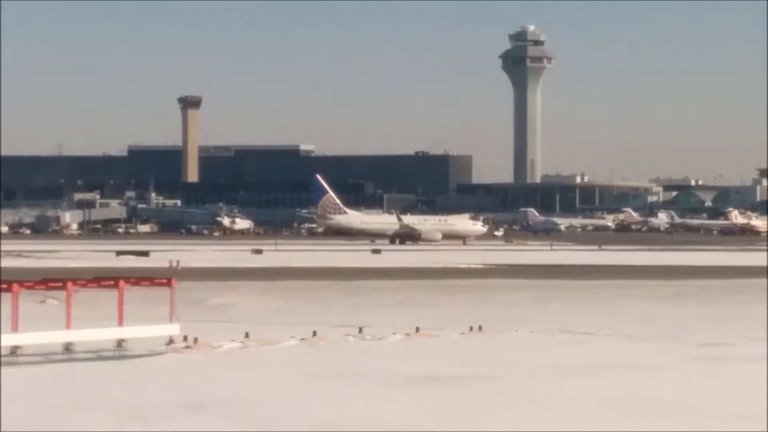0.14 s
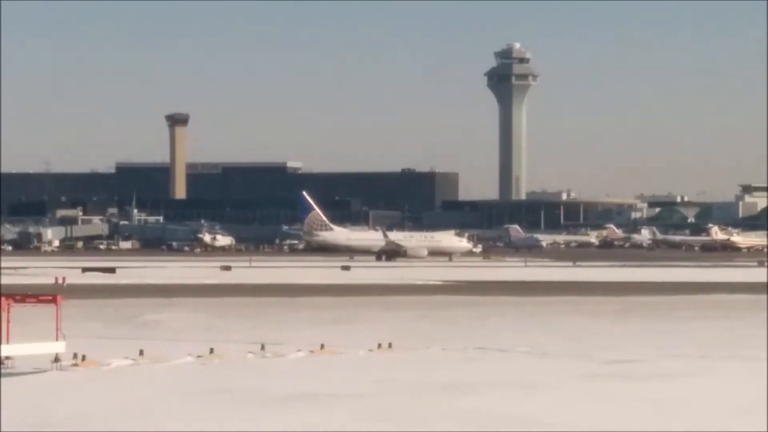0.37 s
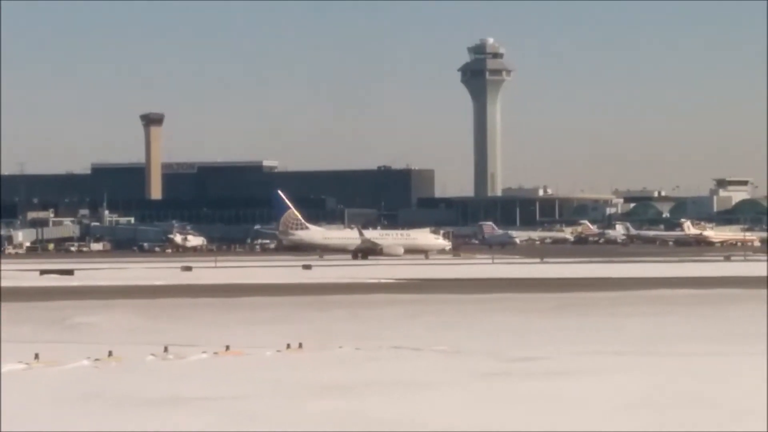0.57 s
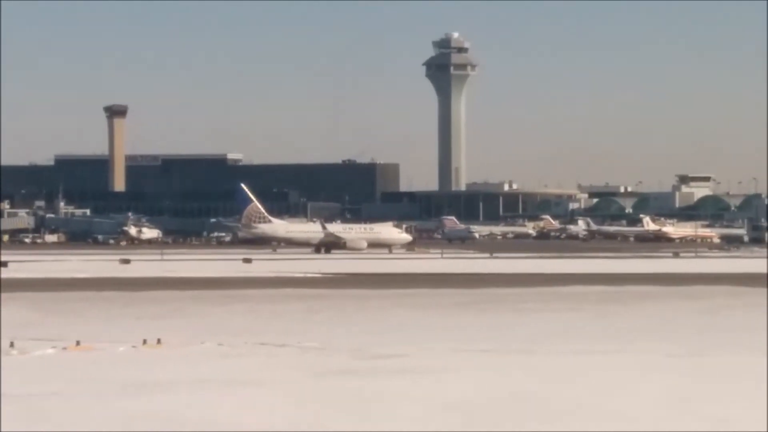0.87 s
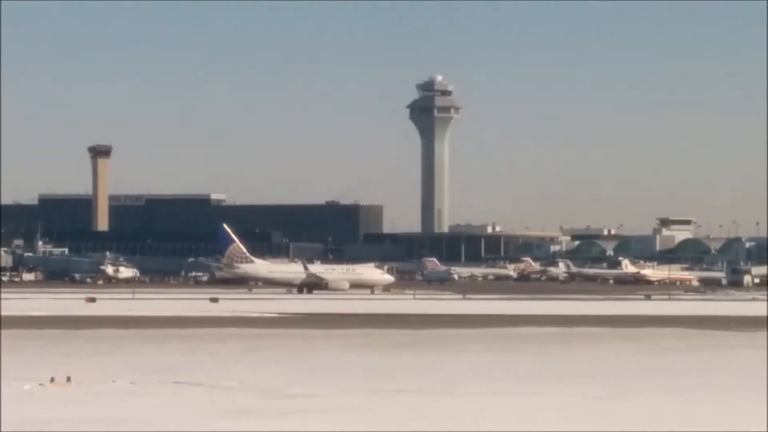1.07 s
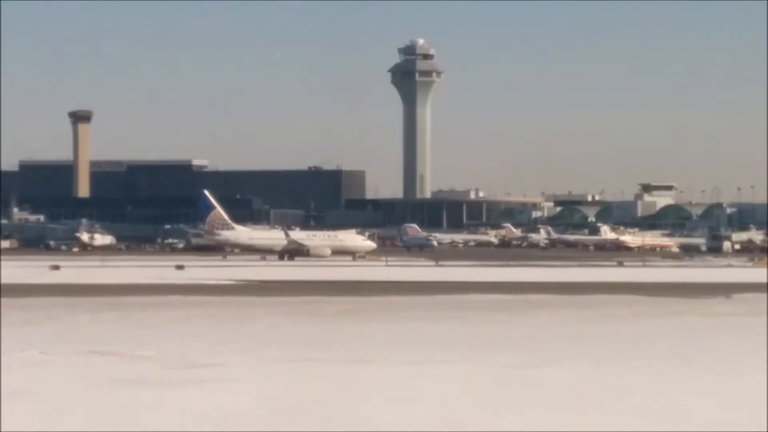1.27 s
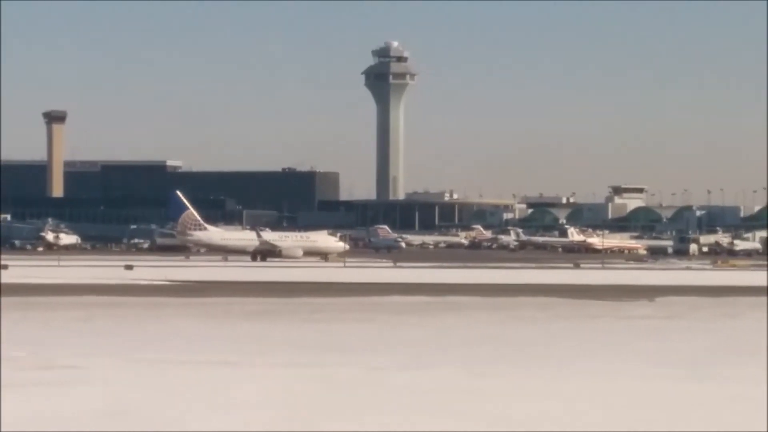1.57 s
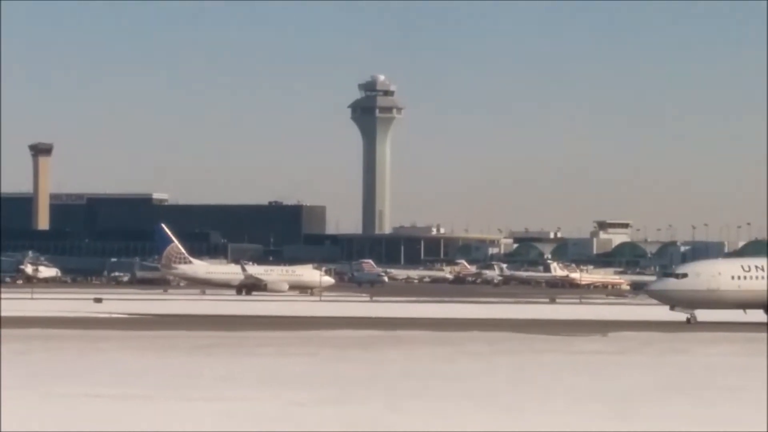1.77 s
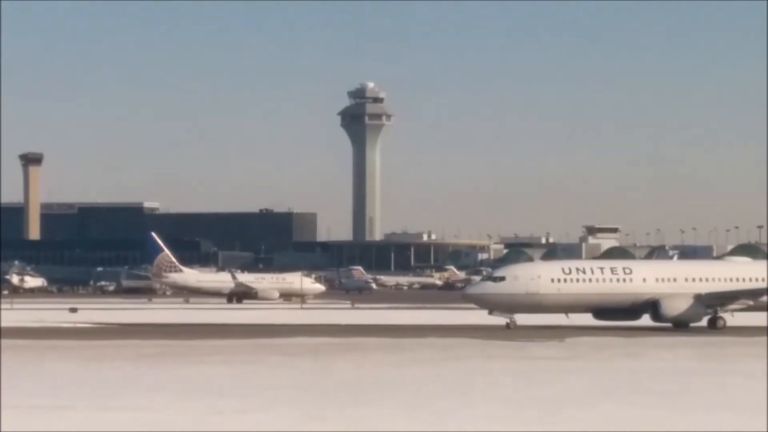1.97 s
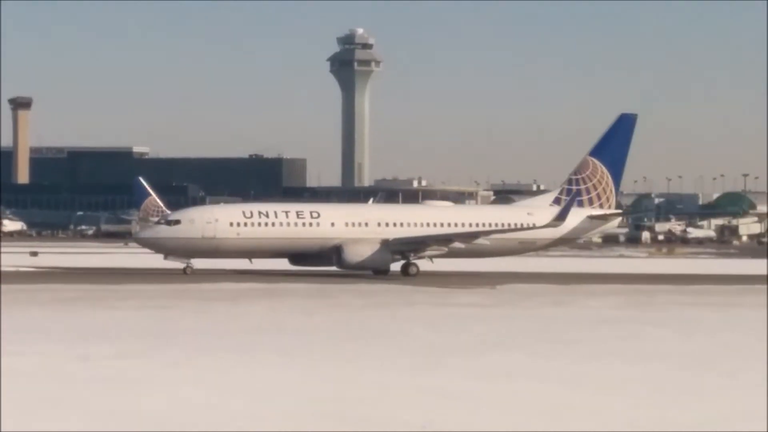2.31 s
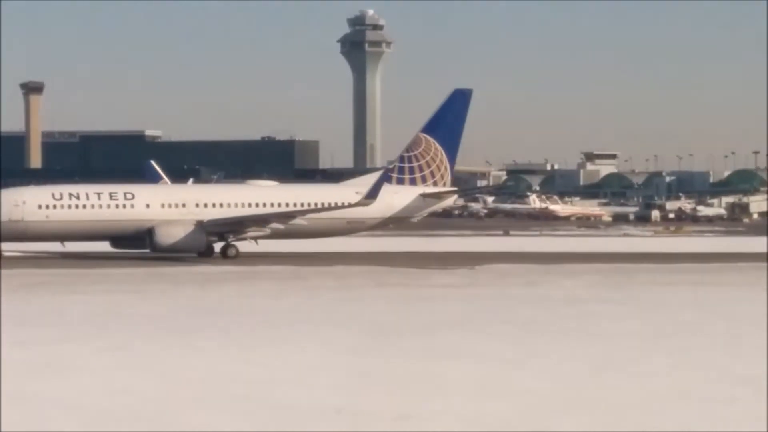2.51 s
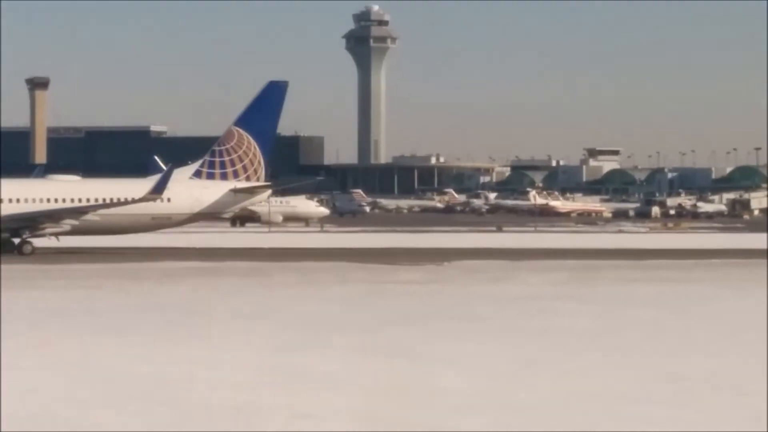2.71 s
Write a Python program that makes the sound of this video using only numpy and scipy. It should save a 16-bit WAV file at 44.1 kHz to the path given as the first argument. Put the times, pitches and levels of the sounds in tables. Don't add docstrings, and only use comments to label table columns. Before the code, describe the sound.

Low cabin rumble of a taxiing airliner runs throughout, with irregular booming wheel jolts, strong near 0.25 and 1.0 seconds. A wavering low engine hum and muffled roar continue beneath, swelling near 1.8, with faint ventilation hiss. Close to the microphone, a soft hollow knock at 0.56, ticks around 0.65 and 1.15-1.4, a gritty scuff at 1.05, fabric rustle and tiny squeaks; one last tick near 2.05.

```python
import sys
import numpy as np
from scipy import signal
from scipy.fft import rfft, irfft, next_fast_len
from scipy.io import wavfile

SR = 44100
rng = np.random.default_rng(int(sys.argv[2]) if len(sys.argv) > 2 else 0)


def amplitude_ratio(level_db):
    exponent = np.asarray(level_db, float) / 20
    return 10 ** exponent


def waveform_to_disk(signal):
    frames = np.transpose(np.atleast_2d(signal))
    scaled = np.clip(frames, -1, 1) * 32767
    samples = np.round(scaled).astype(np.int16)
    wavfile.write(sys.argv[1], SR, samples)


N = 125685
TIME = np.arange(N) / SR


def rms_one(x):
    return x / np.sqrt(np.mean(x ** 2) + 1e-20)


def in_time(rows):
    s, *columns = np.transpose(rows)
    return [np.interp(TIME, s, column) for column in columns]


def drift(rate):
    hop = 40
    r = np.exp(-2 * np.pi * rate * hop / SR)
    noise = rng.standard_normal(N // hop + 2002)
    slow = signal.lfilter([1], [1, -2 * r, r * r], noise)[2000:]
    return np.interp(np.arange(N) / hop, np.arange(len(slow)), rms_one(slow))


def swell(start, length, rise):
    u = np.clip((TIME - start) / length, 0, 1)
    rise = np.clip(rise, .05, .95)
    return np.sin(np.pi / 2 * np.minimum(u / rise, (1 - u) / (1 - rise))) ** 2


def resonate(x, hz, width_hz):
    r = np.exp(-np.pi * width_hz / SR)
    gain = (1 - r * r) / 2
    return signal.lfilter([gain, 0, -gain], [1, -2 * r * np.cos(2 * np.pi * hz / SR), r * r], x + 1e-18)


def humming_noise(hz, width_hz):
    noise = rng.standard_normal(2 * N)
    return rms_one(resonate(resonate(noise, hz, width_hz), hz, width_hz)[N:])


def filtered(x, order, hz, kind):
    return signal.sosfilt(signal.butter(order, hz, kind, fs=SR, output="sos"), x)


def coloured(spectrum, patchy_db, rate):
    hz, db = np.transpose(spectrum)
    size = next_fast_len(N)
    freqs = np.arange(size // 2 + 1) * SR / size + 1e-3
    colour_db = np.interp(np.log(freqs), np.log(hz), db, left=-90, right=-90)
    shaped = rfft(rng.standard_normal(size)) * amplitude_ratio(colour_db)
    place = 4 * np.log2(freqs / hz[0])
    together = drift(rate / 2)
    out = np.zeros(N)
    for k in range(int(4 * np.log2(hz[-1] / hz[0])) + 2):
        window = np.cos(np.pi / 2 * np.clip(place - k, -1, 1)) ** 2
        band = irfft(shaped * window, size)[:N]
        out += band * amplitude_ratio(patchy_db * (0.37 * together + drift(rate)))
    return rms_one(out)


# (time [s], level [dB])
SHAKING = [(0.0, -35.5), (0.52, -38), (0.54, -30), (0.68, -35), (1.02, -36), (1.03, -31), (1.11, -35.5),
           (1.72, -34), (1.85, -33), (1.88, -28), (1.91, -37.5), (2.17, -31.5), (2.23, -36), (2.29, -33),
           (2.52, -39), (2.54, -31), (2.73, -38), (2.85, -32)]


def shaking_level():
    return in_time(SHAKING)[0]


# (time [s], level [dB])
ROUGHNESS = [(0, 8), (.1, 1.5), (.35, 12), (.43, -14.5), (.5, 4), (.86, -1.5), (.95, -7.5), (1.08, -4),
             (1.24, 1.5), (1.32, 3), (1.38, -6.5), (1.7, 1.5), (2.02, 1.5), (2.18, -2), (2.26, 2),
             (2.5, -3), (2.7, 8), (2.75, 3)]


def rolling_level():
    return in_time(ROUGHNESS)[0]


# (start [s], length [s], depth [dB])
SMOOTH_STRETCHES = [
    (0.862, 0.098, -3),
    (1.304, 0.041, -3),
    (2.464, 0.063, -1.5),
    (2.602, 0.034, -14.5),
    (2.72, 0.045, -7),
]


def airframe_unevenness():
    lull_db = sum(db * swell(s, length, 0.58) for s, length, db in SMOOTH_STRETCHES)
    return amplitude_ratio(1.6 * drift(11.9) + lull_db)


# (frequency [Hz], level [dB per Hz])
AIR_COLOUR = [(760, -32.5), (1300, -14.5), (1790, -18), (2140, -11.5), (2520, -5.5), (3480, -15.5),
              (4200, -16.5), (6100, -28), (15500, -40)]


def ventilation_air(stir_db):
    cavity = amplitude_ratio(-58.5 + 3.2 * drift(16)) * humming_noise(2045, 420)
    hiss = amplitude_ratio(-64) * coloured(AIR_COLOUR, patchy_db=3.0, rate=20)
    return amplitude_ratio(0.61 * (stir_db - stir_db.mean())) * (hiss + cavity)


# (frequency [Hz], level [dB per Hz])
ROAR_COLOUR = [(110, -47.5), (180, -6.5), (211, -6.5), (241, -10.5), (351, -14.5), (378, -18.5), (535, -28),
               (1060, -39), (1700, -47.5), (2210, -85.5), (3740, -120)]


def engine_roar(shake_db, roll_db):
    return amplitude_ratio(shake_db + 0.22 * roll_db + 2.5) * coloured(ROAR_COLOUR, patchy_db=4.0, rate=40)


# (frequency [Hz], width [Hz], level [dB])
WEAK_HUMS = [
    (275, 16, -53),
    (140.2, 43, -27.5),
]


def weak_hums():
    return sum(amplitude_ratio(db) * humming_noise(hz, width_hz) for hz, width_hz, db in WEAK_HUMS)


# (time [s], gear tone level [dB], upper tone level [dB])
SECOND_ENGINE = [(0.0, -40, -60), (0.31, -44, -42.5), (0.42, -44, -64), (0.46, -39.5, -49),
                 (0.79, -40, -61), (0.92, -38.5, -33.5), (0.97, -34, -39), (1.42, -44, -45),
                 (1.5, -33.5, -41), (1.67, -45, -55.5), (1.82, -41, -40.5), (2.09, -37, -53.5),
                 (2.14, -34, -38), (2.48, -39.5, -58.5), (2.51, -41, -42.5), (2.64, -31, -61.5),
                 (2.67, -43.5, -42), (2.85, -30.5, -37.5)]


def second_engine():
    gear_db, upper_db = in_time(SECOND_ENGINE)
    gear = np.sin(2 * np.pi * np.cumsum(347.7 + 2 * drift(6.3)) / SR)
    return amplitude_ratio(gear_db + 1.5) * gear + amplitude_ratio(upper_db - 1.5) * humming_noise(412.8, 23)


# (time [s], level [dB])
SHAFT_LEVEL = [(0, -28.5), (.25, -36.5), (.3, -24.5), (.44, -52), (.54, -22), (.67, -26), (.75, -33),
               (1.13, -35.5), (1.6, -33), (1.72, -22), (1.77, -44), (1.83, -15.5), (1.97, -36),
               (2.1, -25.5), (2.19, -29), (2.3, -22), (2.76, -36), (2.82, -25.5)]


def shaft_hum():
    db, = in_time(SHAFT_LEVEL)
    pitch_hz = 206.8 + 2.184 * drift(10.0)
    return np.sqrt(2) * amplitude_ratio(db) * np.sin(2 * np.pi * np.cumsum(pitch_hz) / SR)


# (time [s], level [dB])
RUSTLE_LEVEL = [(0, -54), (.2, -59.5), (.38, -68.5), (.52, -73.5), (.68, -49.5), (.78, -62), (1.0, -55),
                (1.17, -51.5), (1.3, -50), (1.45, -62.5), (1.62, -69.5), (2.04, -75.5), (2.065, -56),
                (2.17, -70.5), (2.4, -69.5), (2.68, -74), (2.705, -61.5), (2.8, -67.5)]
# (frequency [Hz], level [dB per Hz])
CLOTH_COLOUR = [(2470, -48.5), (4200, -13.5), (4510, -37.5), (5030, -12), (6760, 3.5), (7790, 3),
                (9380, -3), (11900, -7), (15500, -22)]


def fabric_rustle():
    db, = in_time(RUSTLE_LEVEL)
    bright = coloured(CLOTH_COLOUR, patchy_db=1.0, rate=15)
    dull = amplitude_ratio(-8) * rms_one(resonate(rng.standard_normal(N), 3510, 1100))
    return amplitude_ratio(db) * (bright + dull)


# (start [s], length [s], pitch [Hz], glide [Hz], level [dB])
RUBS = [(1.542, .02, 3600, -500, -58), (1.644, .055, 3150, -450, -54), (1.965, .055, 2700, 200, -57),
        (2.432, .035, 3880, -30, -58), (2.692, .045, 4000, -200, -59), (1.055, .03, 4200, 30, -46),
        (1.785, .06, 5850, 0, -69), (1.86, .09, 5850, 0, -73), (1.96, .04, 5850, 0, -70),
        (2.0, .03, 5800, 0, -73), (1.75, .04, 4700, 50, -69), (2.055, .025, 4300, -100, -66),
        (2.67, .07, 4750, 0, -70), (2.78, .05, 4750, -50, -70), (2.56, .05, 3900, 0, -70),
        (2.055, .035, 5500, -200, -57), (1.17, .1, 5600, 0, -58)]


def trim_squeaks():
    blur_width_hz = 260
    steady, sideways = filtered(rng.standard_normal((2, N)), 2, blur_width_hz / 2, "low")
    steady, sideways = .6 + rms_one(steady), rms_one(sideways)
    out = np.zeros(N)
    for s, length, hz, glide_hz, db in RUBS:
        age = TIME - s
        phase = 2 * np.pi * age * (hz + glide_hz * age / length / 2)
        tone = steady * np.sin(phase) + sideways * np.cos(phase)
        out += amplitude_ratio(db) * swell(s, length * 1.1, .3) * tone
    return out


# (time [s], peak level [dB], brightness [dB])
TICKS = [(0.572, -33.5, -22), (0.663, -42, -5), (1.174, -36, 9.5), (1.232, -43.5, 3.5), (0.6389, -22.5, -7),
         (0.6514, -26, -20), (0.6754, -47, -9), (0.687, -33, -6), (0.9103, -33.5, -3.5), (1.1602, -22, 2.5),
         (1.17, -25, 4.5), (1.2084, -42, 1), (1.237, -24.5, -19.5), (1.2574, -26, -23), (1.272, -16.5, -6),
         (1.3854, -33.5, -5), (1.769, -42, -1.5), (2.034, -39, -33.5), (2.056, -22.5, -26)]


def trim_ticks():
    rattle, crack = np.zeros(N), np.zeros(N)
    for s, db, bright_db in TICKS:
        age = np.maximum(TIME - s, 0)
        rattle += amplitude_ratio(db) * np.tanh(age / 0.0013) * np.exp(-age / 0.0045)
        tail = 0.4 * np.exp(-age / 0.0081)
        snap = 4 * amplitude_ratio(-6) * np.exp(-age / 0.001)
        crack += amplitude_ratio(db + bright_db) * np.tanh(age * 1500) * (tail + snap)
    ring = 5 * resonate(rattle * rng.standard_normal(N), 5530, 340)
    bright = filtered(crack * rng.standard_normal(N), 1, [5600, 9000], "band")
    return filtered(amplitude_ratio(-11) * ring + amplitude_ratio(-5.5) * bright, 4, 5000, "high")


# (time [s], level [dB])
SCUFF_LEVEL = [(1.005, -49), (1.021, -32.5), (1.04, -31.5), (1.062, -35), (1.08, -34.5), (1.11, -43)]
# (frequency [Hz], level [dB per Hz])
SCUFF_COLOUR = [(400, -2.5), (594, -4), (1000, -17), (1900, -12.5), (3000, -13.5), (4900, -17),
                (8360, -16.5), (15500, -37)]


def scuff():
    db, = in_time(SCUFF_LEVEL)
    start, end = SCUFF_LEVEL[0][0], SCUFF_LEVEL[-1][0]
    gate = np.sqrt(swell(start, end - start, 0.044))
    return amplitude_ratio(db + 3.0 * drift(150)) * gate * coloured(SCUFF_COLOUR, patchy_db=2.8, rate=40)


# (frequency [Hz], width [Hz], level [dB])
PANEL = [
    (607, 89, 1.5),
    (288, 152, 3),
    (430, 120, -6.5),
    (875, 260, -10),
    (1180, 160, -14.5),
]


def knock():
    start_s, length_s, level_db = .558, .04, -30.5
    push = rng.standard_normal(N)
    body = np.zeros(N)
    for k, (hz, width_hz, db) in enumerate(PANEL):
        sign = (-1) ** k
        body += sign * amplitude_ratio(db) * rms_one(resonate(push, hz, width_hz))
    return amplitude_ratio(level_db) * swell(start_s, length_s, .42) * body


# (frequency [Hz], level [dB per Hz])
RUMBLE_COLOUR = [(13, -52), (22, -4.5), (92, 10), (140, 3), (177, -16.5), (209, -14.5), (223, -17.5),
                 (237, -20), (260, -30), (340, -62.5), (570, -120)]


def rolling_rumble(roll_db):
    return amplitude_ratio(roll_db - 28) * coloured(RUMBLE_COLOUR, patchy_db=6.5, rate=13.0)


# (start [s], length [s], level [dB], pitch [Hz])
JOLTS = [(0.147, 0.038, -14.5, 101.5), (0.24, 0.1, -9.5, 91.2), (0.72, 0.024, -13, 103),
         (0.977, 0.081, -9, 96.2), (1.103, 0.056, -17.5, 95), (1.361, 0.047, -15.5, 89.7),
         (1.409, 0.025, -12, 92), (1.81, 0.039, -12.5, 129), (2.256, 0.021, -11, 120.4),
         (2.353, 0.022, -14, 108.4), (2.399, 0.03, -14.5, 103), (2.531, 0.056, -16, 110.9),
         (2.687, 0.017, -15.5, 101)]
# (start [s], length [s], level [dB], pitch [Hz])
THUDS = [
    (1.05, 0.064, -19.5, 46.4),
    (1.192, 0.065, -17.5, 119),
    (1.735, 0.078, -19.5, 57),
    (1.909, 0.053, -18.5, 88.6),
    (2.394, 0.12, -20.5, 49.5),
    (2.794, 0.055, -23, 113),
    (0.849, 0.022, -14, 128),
    (2.635, 0.032, -22, 88),
]
# (start [s], length [s], level [dB], pitch [Hz])
BUMPS = [(.004, 0.01, -14.5, 133), (.05, 0.017, -12.5, 132), (.19, 0.021, -13.5, 126.5),
         (0.512, 0.036, -21.5, 121.6), (.545, 0.082, -22.5, 155), (.613, .05, -20.5, 115),
         (.775, 0.023, -19, 111), (1.045, 0.038, -20, 140.5), (1.143, 0.026, -10, 105.6),
         (1.235, 0.045, -24.5, 108), (1.34, 0.026, -15.5, 85), (1.445, 0.044, -20.5, 104),
         (1.519, 0.04, -21.5, 115), (1.585, 0.043, -22.5, 109.5), (1.65, 0.046, -28, 128),
         (1.853, 0.056, -19.5, 128), (2.064, 0.035, -18, 124), (2.224, 0.035, -19, 108),
         (2.3, 0.024, -22, 121), (2.56, .05, -21.5, 142.7), (2.705, 0.028, -19, 102),
         (2.765, 0.043, -27, 133)]


def wheel_jolts():
    stretch, sag, trim_db = 0.97, 0.094, 5
    out = np.zeros(N)
    for s, length, db, hz in JOLTS + THUDS + BUMPS:
        span = length * stretch
        age = TIME - s
        turns = hz * age * (1 + sag * (.5 - age / span / 2)) + rng.random()
        envelope = swell(s - (span - length) / 2, span, 0.45)
        out += amplitude_ratio(db + trim_db) * envelope * np.sin(2 * np.pi * turns)
    return out


def scene():
    shake_db, roll_db = shaking_level(), rolling_level()
    hums = amplitude_ratio(0.25 * roll_db) * (weak_hums() + second_engine() + shaft_hum())
    through_airframe = hums + engine_roar(shake_db, roll_db) + rolling_rumble(roll_db)
    mix = airframe_unevenness() * through_airframe
    mix += ventilation_air(shake_db + 0.49 * roll_db)
    mix += fabric_rustle() + trim_squeaks() + trim_ticks() + scuff() + knock()
    mix += wheel_jolts()
    return mix[None]


# (start [s], length [s], depth [dB])
TREBLE_GAPS = [
    (.042, .018, -18),
    (.123, .02, -12),
    (.607, .02, -12),
    (1.576, .022, -16),
    (2.425, .018, -12),
]


def treble_gaps(x):
    gap = sum((1 - amplitude_ratio(db)) * swell(s, length, .5) ** .15 for s, length, db in TREBLE_GAPS)
    treble = signal.sosfiltfilt(signal.butter(4, 2600, "high", fs=SR, output="sos"), x)
    return x - gap * treble


def roll_off(x):
    return signal.sosfilt(signal.butter(12, 15710, fs=SR, output="sos"), x)


def record(dry):
    x = filtered(dry, 2, 36, "high")
    x = x - 0.54 * resonate(x, 4540, 720)
    x = signal.sosfilt(signal.cheby2(12, 60, 16300, fs=SR, output="sos"), x)
    x = treble_gaps(x)
    edge = np.minimum(np.arange(N) + 30, N + 10 - np.arange(N)) / 150
    return roll_off(x * np.minimum(edge, 1))


dry = scene()
out = record(dry)
waveform_to_disk(out)
```